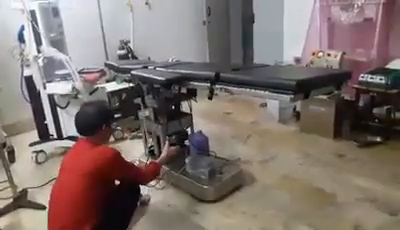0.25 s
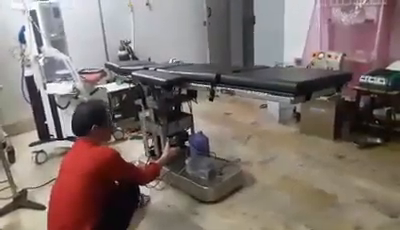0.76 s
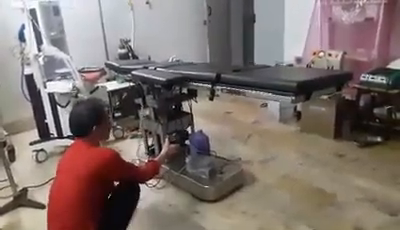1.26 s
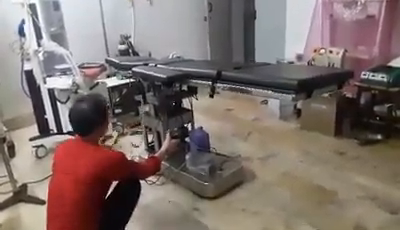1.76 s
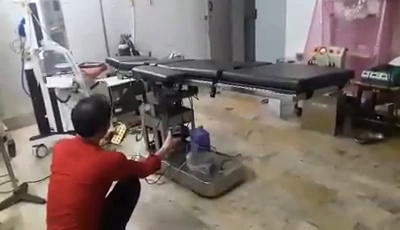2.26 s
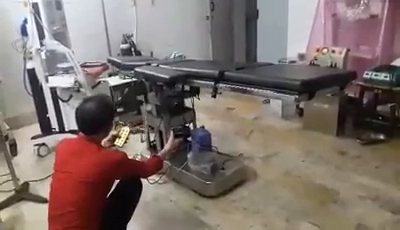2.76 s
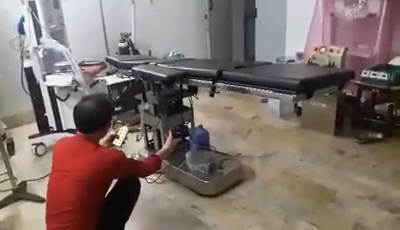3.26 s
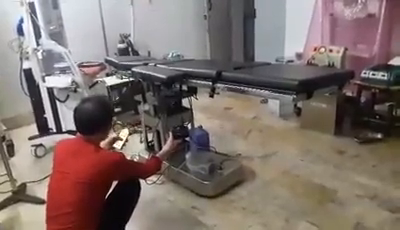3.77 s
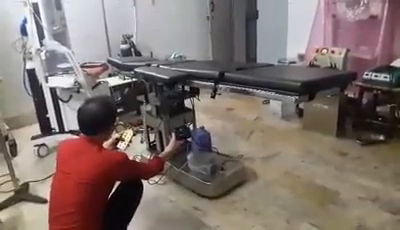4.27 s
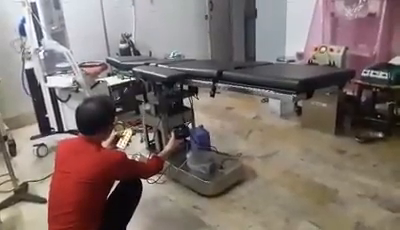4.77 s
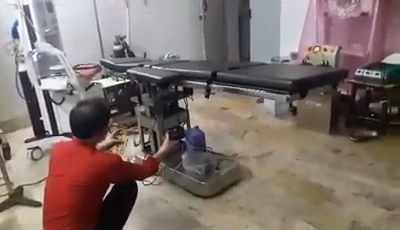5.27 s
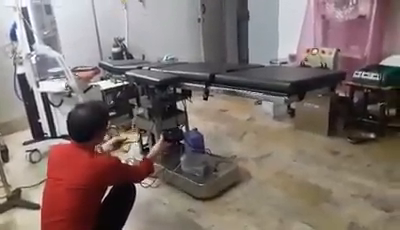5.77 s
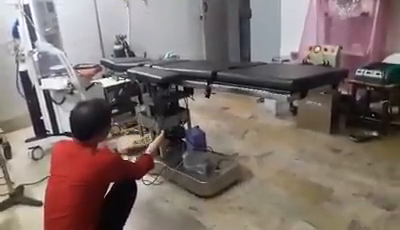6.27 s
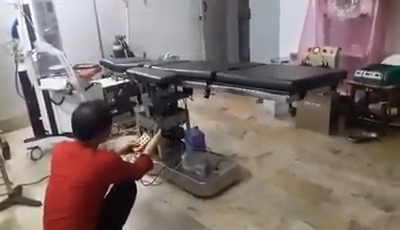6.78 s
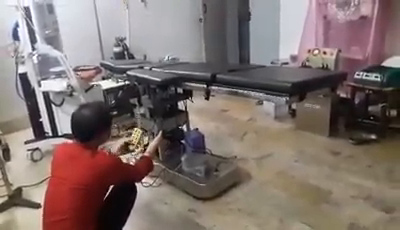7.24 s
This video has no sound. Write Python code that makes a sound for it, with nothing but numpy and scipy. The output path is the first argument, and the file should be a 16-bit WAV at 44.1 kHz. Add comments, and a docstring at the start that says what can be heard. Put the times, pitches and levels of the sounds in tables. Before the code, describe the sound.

An operating table's electric motor drive whines continuously with an uneven throb, over metallic rattle, low drone and gritty friction hiss in a hard-walled room.

```python
"""A throbbing gear whine stands out first: an operating table's electric drive in a hard-walled room.
Whine, bearing song, frame drone and the hum of a pump with three strokes a turn are sines on one motor clock.
A noise rattle, partly repeated with every shaft turn, excites the resonances of the metal parts.
Filtered noise adds churning, rumble and bright friction hiss; random clicks make the rasp and ticks."""
import sys
import numpy as np
from scipy import signal
from scipy.fft import rfft, irfft, next_fast_len
from scipy.io import wavfile
from scipy.ndimage import uniform_filter1d

SR = 44100
rng = np.random.default_rng(int(sys.argv[2]) if len(sys.argv) > 2 else 0)


def dump(signal):
    """Clip the signal to [-1, 1] and save it as 16-bit WAV at the path in sys.argv[1]."""
    limited = np.clip(np.atleast_2d(signal).T, -1, 1)
    pcm = np.round(limited * 32767).astype(np.int16)
    wavfile.write(sys.argv[1], SR, pcm)


N = 331191  # samples

SHAFT_HZ = 23.27
STROKES_PER_TURN = 3


def drive(clock, grip):
    """Common excitation: one rattle shakes every part; housing and bearings also follow the grip."""
    # Resonances of the housing. Each row: frequency in Hz, width in Hz, level in dB.
    housing_modes = [(193, 27, -53), (345, 34, -50), (414.7, 45, -47.5), (1794, 160, -41.5),
                     (2685, 140, -43.5)]
    shake = rattle(clock, repeat=0.14, throb_db=-1.0, grain_db=1.0, wet_db=-7.5)
    gripped = resonate(shake, housing_modes) + bearings(clock, shake)
    ungripped = gears(clock, shake) + base_pan(clock, shake) + frame(clock, shake)
    return grip * gripped + ungripped


def gears(clock, shake):
    """Gear meshing: the whine and a cluster of weaker mesh tones over the gearbox's resonances."""
    # Resonances of the gearbox. Each row: frequency in Hz, width in Hz, level in dB.
    gear_modes = [(1282, 334, -38.5), (1433, 83, -40)]
    # Weaker mesh tones. Each row: frequency in Hz, level in dB before the lift below.
    gear_tones = [(1026, -54), (1096, -59), (1131, -53.5), (1178, -59), (1201, -54), (1263, -55),
                  (1282, -53.5), (1304, -56), (1324, -49), (1345, -53), (1360, -50.5), (1375, -53),
                  (1424, -53)]
    # Slow swell of both. Each row: time in seconds, relative level in dB before deepening.
    gear_level = [(0, -30.5), (0.7, -29), (1.8, -30), (3.0, -27.5), (3.8, -30), (4.7, -30), (5.3, -29.5),
                  (5.7, -30.5), (6.6, -29.5), (7.51, -30)]
    level_db, = in_time(gear_level)
    mesh = tones(clock, gear_tones, waver_db=4.0, waver_rate=4.4, phase_jitter=0.8)
    body = resonate(shake, gear_modes) + from_db(4.0) * mesh
    return swelling(level_db, depth=1.1, flutter_db=0.3) * body + whine(clock)


def whine(clock):
    """Modulation of the strongest mesh tones: they waver finely in pitch and throb together."""
    # Strongest mesh tones. Each row: frequency in Hz, level in dB before the lift below.
    whine_tones = [(1401, -40), (1412, -47.5), (1429, -51), (1441, -40), (1460, -44.5)]
    # Uneven throb, about three a second. Each row: time in seconds, relative level in dB before deepening.
    whine_level = [(0, -23.5), (0.11, -32.5), (0.22, -28.5), (0.45, -28.5), (0.62, -30), (0.81, -27.5),
                   (0.95, -31.5), (1.12, -33), (1.2, -26), (1.32, -32.5), (1.46, -26), (1.64, -33),
                   (2.08, -27.5), (2.22, -34), (2.36, -27.5), (2.48, -31), (2.73, -27), (2.81, -31),
                   (2.95, -29.5), (3.35, -30), (3.95, -33.5), (4.05, -29.5), (4.3, -37), (4.39, -28),
                   (4.55, -33), (4.65, -29), (4.8, -38), (4.93, -26), (5.03, -36), (5.35, -26.5),
                   (5.5, -38), (5.62, -29.5), (5.7, -36), (5.77, -27), (5.84, -32.5), (5.97, -29),
                   (6.38, -32.5), (6.55, -32.5), (6.73, -31), (6.83, -34), (6.92, -33.5), (7.18, -28.5),
                   (7.33, -31.5), (7.51, -28)]
    throb_db, = in_time(whine_level)
    lines = tones(clock, whine_tones, waver_db=1.5, waver_rate=4.0, phase_jitter=0.84)
    # The beats between the lines are evened out, so the throb comes from the curve.
    even = np.std(lines) * levelled(lines, window_s=0.17)
    return from_db(1.5) * swell(1.3 * throb_db) * even


def base_pan(clock, shake):
    """Plate resonance: the sheet-metal pan rings in a lower and an upper range, which swell separately."""
    # Resonances of the pan. Each row: frequency in Hz, width in Hz, level in dB.
    pan_modes = [(664, 46, -44), (867, 106, -41.5)]
    # Steady tones of the pan. Each row: frequency in Hz, level in dB before the lift below.
    pan_tones = [(558, -58), (629, -47), (637, -56), (668, -52.5), (685, -53), (837, -48.5), (854, -53),
                 (898, -53), (901, -46), (907, -55), (914, -55), (937, -56)]
    # Slow swell. Each row: time in seconds, then relative level in dB before scaling by depth,
    # first for the range below the split, then for the range above it.
    pan_level = [(0, -42, -41), (0.3, -37, -36), (0.6, -40.5, -38.5), (1.2, -35, -38), (1.5, -36.5, -36.5),
                 (1.75, -40, -39), (2.1, -40, -38.5), (2.35, -32.5, -34.5), (2.53, -33.5, -36.5),
                 (2.68, -34.5, -33), (2.86, -36, -32), (3.05, -36.5, -38), (3.3, -36.5, -35.5),
                 (3.65, -44, -41), (3.85, -42, -36.5), (4.6, -40, -40), (5.1, -41, -38), (5.3, -42, -44),
                 (5.55, -42, -36), (5.9, -39.5, -38), (6.5, -39, -38.5), (7.51, -42, -38.5)]
    split_hz = 760
    low_db, high_db = in_time(pan_level)
    out = 0
    for level_db, upper in ((low_db, False), (high_db, True)):
        modes = [row for row in pan_modes if (row[0] > split_hz) == upper]
        rows = [row for row in pan_tones if (row[0] > split_hz) == upper]
        lines = tones(clock, rows, waver_db=1.3, waver_rate=1.44, phase_jitter=0.38)
        ring = resonate(shake, modes) + from_db(0.5) * lines
        out = out + swelling(level_db, depth=0.97, flutter_db=0.7) * ring
    return out


def bearings(clock, shake):
    """Narrow-band resonance: thin high tones come and go over a ring excited by the rattle."""
    # Resonance of the bearings. Each row: frequency in Hz, width in Hz, level in dB.
    bearing_modes = [(3382, 206, -41.5)]
    # Thin tones. Each row: frequency in Hz, level in dB before the lift below.
    bearing_tones = [(2539, -56), (2642, -58), (2702, -57), (3292, -57), (3333, -53.5), (3403, -57),
                     (3424, -57), (3473, -57), (3496, -58)]
    # Slow swell. Each row: time in seconds, relative level in dB before scaling by depth.
    bearing_level = [(0, -40.5), (1.6, -41), (2.7, -39.5), (3.6, -41), (4.05, -39), (4.55, -36.5),
                     (5.0, -39), (5.4, -39), (5.8, -41.5), (6.9, -42), (7.51, -40)]
    level_db, = in_time(bearing_level)
    lines = tones(clock, bearing_tones, waver_db=3.5, waver_rate=4.5, phase_jitter=0.7)
    song = resonate(shake, bearing_modes) + from_db(3.5) * lines
    return swelling(level_db, depth=0.81, flutter_db=0.5) * song


def frame(clock, shake):
    """Structure-borne sound: the steel frame drones on two main tones amid weaker lines and a resonance."""
    # Resonance of the frame. Each row: frequency in Hz, width in Hz, level in dB.
    frame_modes = [(304.5, 43, -43.5)]
    # Weaker lines. Each row: frequency in Hz, level in dB.
    frame_tones = [(264, -54.5), (302, -55), (326, -50), (335, -53.5), (343, -45)]
    # Slow swell of resonance and lines. Each row: time in seconds, relative level in dB before scaling.
    frame_level = [(0, -40), (0.3, -39.5), (0.55, -44), (1.05, -46.5), (1.75, -38), (2.05, -43.5),
                   (2.3, -33.5), (2.65, -38), (3.7, -39.5), (4.2, -40.5), (4.75, -36.5), (5.5, -40),
                   (6.55, -40), (7.3, -38.5), (7.51, -39)]
    # The two main drones swell and fade separately. Each row: time in seconds, level in dB.
    low_drone = [(0, -45.5), (0.6, -42.5), (1.1, -43), (1.65, -36), (2.05, -43), (2.55, -46), (2.8, -47.5),
                 (3.35, -43.5), (3.8, -44), (4.6, -50), (5.1, -44), (5.45, -49.5), (5.75, -39), (6.4, -52),
                 (7.3, -41), (7.51, -45)]
    high_drone = [(0, -46), (0.8, -41), (1.25, -43), (1.55, -37), (1.85, -33.5), (2.1, -39.5),
                  (2.55, -38.5), (3.1, -59), (3.95, -40.5), (4.7, -51), (5.6, -45.5), (6.7, -54),
                  (7.51, -46.5)]
    level_db, = in_time(frame_level)
    lines = tones(clock, frame_tones, waver_db=2.0, waver_rate=2.1, phase_jitter=0.25)
    body = swelling(level_db, depth=0.84, flutter_db=0.7) * (resonate(shake, frame_modes) + lines)
    return body + drone(clock, 293, low_drone) + drone(clock, 310, high_drone)


def pump(clock):
    """Harmonic series: the pressure strokes hum low, with two overtones that swell in turn."""
    # Levels of the first three harmonics. Each row: time in seconds, level in dB.
    hum_first = [(0.0, -57), (0.29, -53.5), (0.5, -68), (1.02, -57.5), (1.15, -70), (1.36, -56),
                 (1.57, -73), (2.15, -65), (2.63, -53), (3.0, -53), (3.8, -53.5), (4.15, -50), (4.85, -51),
                 (5.5, -59), (5.68, -64), (6.3, -51), (6.92, -76), (7.08, -61), (7.51, -54)]
    hum_second = [(0, -57), (0.35, -59), (0.7, -58), (1.05, -63), (1.35, -54), (1.9, -53.5), (2.2, -61.5),
                  (2.65, -63), (3.0, -55), (3.25, -62), (3.6, -54), (4.25, -51), (4.8, -61), (5.25, -65),
                  (5.65, -55), (5.9, -65), (6.35, -61), (7.51, -59)]
    hum_third = [(0, -56), (0.2, -50), (0.7, -64), (0.97, -45), (1.2, -58.5), (1.45, -47), (1.95, -68),
                 (2.4, -53), (3.75, -60), (4.0, -65), (4.7, -46), (4.9, -52.5), (5.1, -48.5), (5.7, -63),
                 (6.0, -54), (6.6, -46.5), (6.9, -50), (7.51, -60)]
    stroke_hz = STROKES_PER_TURN * SHAFT_HZ
    curves = (hum_first, hum_second, hum_third)
    return sum(drone(clock, k * stroke_hz, curve) for k, curve in enumerate(curves, 1))


def friction(clock, grip):
    """Broadband friction noise: churning of the mechanism, a low rumble and the hiss of sliding surfaces."""
    # Spectra of the three noises. Each row: frequency in Hz, relative density in dB per Hz.
    churn_colour = [(20, -40), (100, -7.5), (200, -8), (400, 2), (520, 1), (750, 4.5), (1100, 2),
                    (1650, -2), (2200, -5.5), (2850, -6), (3100, -9), (3400, -18), (4200, -45), (8000, -33)]
    rumble_colour = [(20, -34), (35, -30), (48, -26), (90, -16), (125, 3.5), (160, -9), (190, 2),
                     (260, -5.5), (600, -46)]
    hiss_colour = [(2500, -18), (4150, -0.5), (5000, -9), (5200, -0.5), (5600, 2.5), (5850, -3),
                   (6200, -2.5), (6450, 3.5), (6750, 4), (6900, 3.5), (7080, 2.5), (7400, 1.5), (8100, -6),
                   (8400, 3.5), (8750, 1), (8940, 3.5), (9150, -3.5), (9700, -5), (9950, -11),
                   (12000, -15.5), (15000, -26.5)]
    # Upwellings of the rumble. Each row: centre in seconds, half length in seconds, level in dB.
    upwellings = [(3.68, 0.19, -49), (4.4, 0.15, -58), (4.75, 0.034, -51), (5.99, 0.069, -49),
                  (6.38, 0.2, -44), (6.68, 0.044, -52), (6.89, 0.08, -47)]
    mechanism = rattle(clock, repeat=0.14, throb_db=0.0, grain_db=0.0, wet_db=-6.5)
    churn = from_db(-36.5) * coloured(mechanism, churn_colour)
    rumble_gain = from_db(-64.5) + bumps(upwellings)  # steady bed plus upwellings
    rumble = rumble_gain * coloured(rng.standard_normal(N), rumble_colour)
    sliding = rattle(clock, repeat=0.026, throb_db=-0.2, grain_db=0.83, wet_db=-7.0)
    hiss = from_db(-36.5) * coloured(sliding, hiss_colour)
    return grip * (churn + hiss) + rumble


def rasp(grip):
    """Granular friction: coarse grains from the sliding surfaces grow with the grip and briefly surge."""
    # Surges. Each row: centre in seconds, half length in seconds, level in dB before halving.
    surges = [(0.88, .015, -44), (1.96, 0.013, -45), (2.86, 0.018, -44), (4.06, .02, -40),
              (4.25, 0.013, -42), (6.65, .012, -45)]
    # Spectrum of the grains. Each row: frequency in Hz, relative density in dB per Hz.
    rasp_colour = [(1000, -22), (1900, 0), (2400, 0), (3400, -0.5), (4500, -7), (6500, -4.5), (9000, -8),
                   (11000, -26), (15000, -35)]
    grains = room(contacts(rate=600, spread_db=2.5), t60=0.28, wet_db=0.5)
    gain = from_db(-42) * grip ** 2 + bumps(surges) / 2
    return gain * coloured(grains, rasp_colour)


def scuffs():
    """Noise bursts: brief soft brushes in the top of the treble."""
    # Each row: centre in seconds, half length in seconds, level in dB.
    brushes = [(2.665, .028, -49), (4.74, .015, -54)]
    colour = [(4000, -20), (10000, 4), (15000, -5), (17000, -30)]  # Hz, dB per Hz
    return bumps(brushes) * coloured(rng.standard_normal(N), colour)


def ticks():
    """Impulsive contact: single sharp snaps at random moments, about sixteen a second."""
    # Spectrum of the snaps. Each row: frequency in Hz, relative density in dB per Hz.
    tick_colour = [(300, 1), (1500, -8), (7000, -6), (9000, 0.5), (11000, -13), (15000, -26)]
    return from_db(-54) * coloured(contacts(rate=16, spread_db=5), tick_colour)


def rattle(clock, repeat, throb_db, grain_db, wet_db):
    """Cyclic noise: dense uneven contacts throb with the strokes; a power share repeats with every turn."""
    turns = SHAFT_HZ * clock
    one_turn = irfft(np.exp(2j * np.pi * rng.random(round(SR / SHAFT_HZ))))  # flat spectrum, random phase
    repeated = rms_one(np.interp(turns % 1, np.linspace(0, 1, len(one_turn)), one_turn))
    loose = rms_one(rng.standard_normal(N) * from_db(grain_db * drift(46)))
    share = np.clip(repeat, 0, 1)
    mixed = np.sqrt(share) * repeated + np.sqrt(1 - share) * loose
    stroke = from_db(throb_db * np.cos(2 * np.pi * STROKES_PER_TURN * turns))
    return room(mixed * stroke, t60=0.21, wet_db=wet_db)


def contacts(rate, spread_db):
    """Random impulses: clicks at chance moments (rate per second), of uneven size and either sign."""
    born = rng.random(N) < rate / SR
    size = from_db(spread_db * rng.uniform(-1.3, 1.3, N))
    return born * size * rng.choice([-1, 1], N)


def motor_time(wobble, rate):
    """Speed fluctuation: time as the motor counts it, its speed wavering very slightly."""
    return np.cumsum(1 + wobble * drift(rate)) / SR


def tones(clock, table, waver_db, waver_rate, phase_jitter):
    """Amplitude and phase modulation: lines on the motor clock each fade and wander on their own."""
    out = 0
    for hz, level_db in table:
        phase = 2 * np.pi * (hz * clock + rng.random()) + phase_jitter * drift(waver_rate)
        fade = swell(waver_db * drift(waver_rate))
        out = out + from_db(level_db) * fade * np.sqrt(2) * np.sin(phase)
    return out


def drone(clock, hz, curve):
    """Pure tone: one clean line locked to the motor clock, on its level curve."""
    level_db, = in_time(curve)
    return from_db(level_db) * np.sqrt(2) * np.sin(2 * np.pi * (hz * clock + rng.random()))


def resonate(x, modes):
    """Parallel resonances, each passed twice so that the valleys between them stay dark."""
    out = 0
    for hz, width, level_db in modes:
        # One pass is 1.55 times too wide; the second narrows it to the stated width.
        b, a = signal.iirpeak(hz, hz / (1.55 * width), fs=SR)
        once = signal.lfilter(b, a, x)
        out = out + from_db(level_db) * rms_one(signal.lfilter(b, a, once))
    return out


def room(x, t60, wet_db):
    """Reverberation: direct sound plus a dense, exponentially dying tail from the bare walls; rms 1."""
    t = np.arange(SR // 2) / SR
    tail = rng.standard_normal(len(t)) * from_db(-60 * t / t60)
    wet = signal.fftconvolve(x, tail / np.linalg.norm(tail))[:N]
    return rms_one(x + from_db(wet_db) * wet)


def coloured(x, spectrum):
    """Spectral shaping: weight x by a curve of dB over log frequency; rms 1."""
    size = next_fast_len(N)
    hz, level_db = np.transpose(spectrum)
    bins = np.maximum(np.arange(size // 2 + 1) * SR / size, 1)
    gain = from_db(np.interp(np.log(bins), np.log(hz), level_db))
    return rms_one(irfft(rfft(x, size) * gain, size)[:N])


def swelling(level_db, depth, flutter_db):
    """Slow modulation: a gain of rms 1 from a level curve scaled by `depth`, plus a chance flutter."""
    return swell(depth * level_db + flutter_db * drift(3))


def swell(level_db):
    """Normalised envelope: a level curve as a gain of rms 1."""
    return rms_one(from_db(level_db))


def bumps(rows):
    """Gaussian envelopes: one bell-shaped rise and fall per row, its half length the standard deviation."""
    t = np.arange(N) / SR
    return sum(from_db(level_db) * np.exp(-.5 * ((t - s) / length) ** 2) for s, length, level_db in rows)


def drift(rate):
    """Low-passed noise: slow chance of rms 1, changing about `rate` times a second."""
    # Drawn once every 100 samples through two equal poles; the first 1000 values let the filter settle.
    r = np.exp(-200 * np.pi * rate / SR)
    noise = rng.standard_normal(N // 100 + 1002)
    slow = signal.lfilter([1], [1, -2 * r, r * r], noise)[1000:]
    return np.interp(np.arange(N) / 100, np.arange(len(slow)), rms_one(slow))


def levelled(x, window_s):
    """Automatic gain: divide x by its running rms."""
    power = uniform_filter1d(x ** 2, size=max(int(window_s * SR), 1))
    return x / np.sqrt(power + 1e-12)


def in_time(rows):
    """Linear interpolation: the columns of a curve at every sample."""
    s, *columns = np.transpose(rows)
    return [np.interp(np.arange(N) / SR, s, c) for c in columns]


def from_db(db):
    """Logarithmic level: decibels to amplitude gain."""
    return 10 ** (np.asarray(db) / 20)


def rms_one(x):
    """Power normalisation: scale to rms 1."""
    return x / np.sqrt(np.mean(x ** 2) + 1e-20)


def scene():
    """Superposition: the sounds of one drive straight ahead add up, alike in both channels."""
    clock = motor_time(wobble=.0004, rate=.8)
    grip = swell(0.46 * drift(16))  # the sliding surfaces grip and ease: spread in dB, rate per second
    machine = drive(clock, grip) + pump(clock)
    noises = friction(clock, grip) + rasp(grip) + scuffs() + ticks()
    mono = machine + noises
    return np.array([mono, mono])


def record(dry):
    """Linear filtering: a few narrow dips in the treble and a steep cut of the top."""
    # Each row: centre in Hz, width in Hz at half the dB depth, depth in dB.
    treble_dips = [(3910, 81, -14), (3690, 112, -15.5), (7550, 330, -13.5), (11460, 200, -7)]
    cutoff_hz = 15100
    for hz, width, depth_db in treble_dips:
        half_depth = from_db(depth_db / 2)
        b, a = signal.iirpeak(hz, hz / width * half_depth, fs=SR)
        dry = dry + (from_db(depth_db) - 1) * signal.lfilter(b, a, dry)
    low_pass = signal.ellip(12, .1, 90, cutoff_hz, fs=SR, output="sos")
    return signal.sosfilt(low_pass, dry)


dry = scene()
out = record(dry)
dump(out)
```